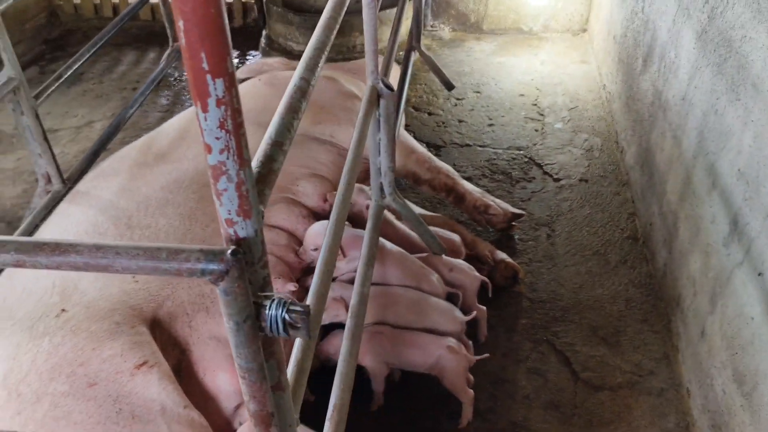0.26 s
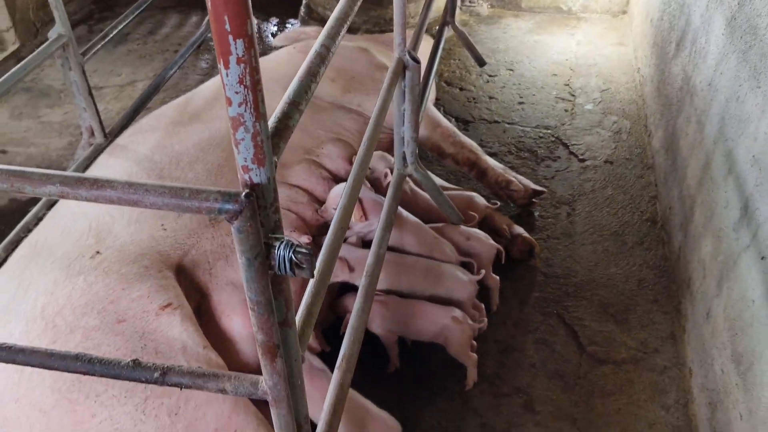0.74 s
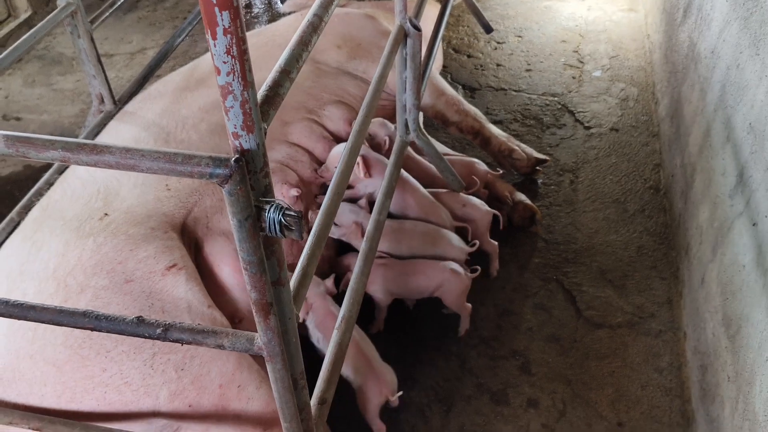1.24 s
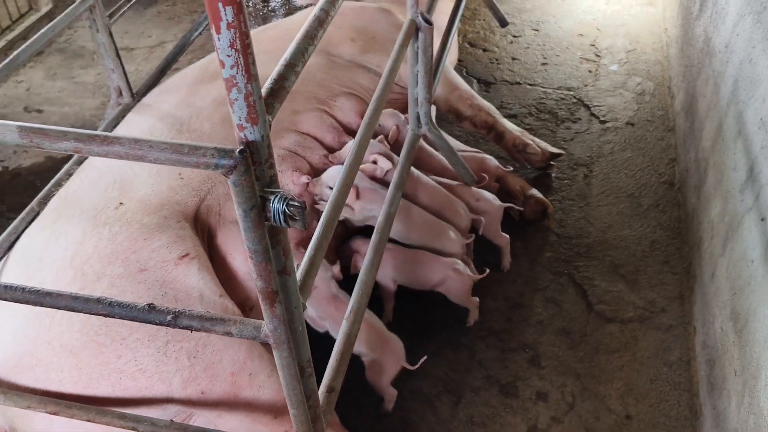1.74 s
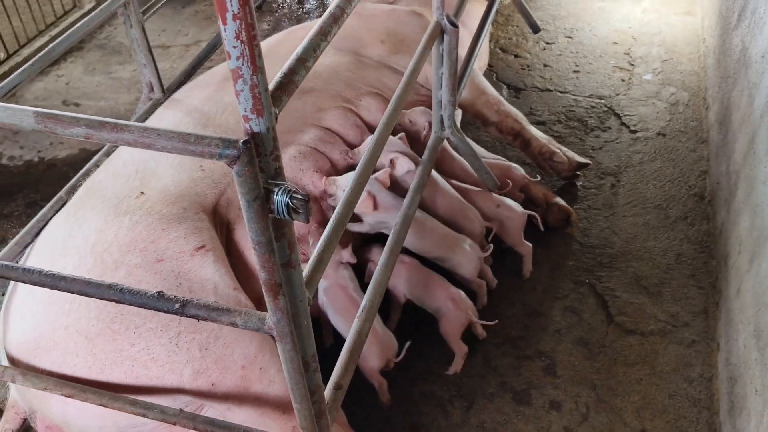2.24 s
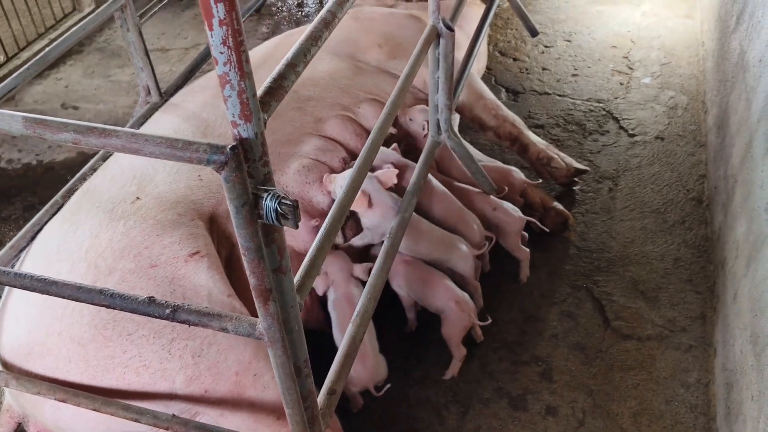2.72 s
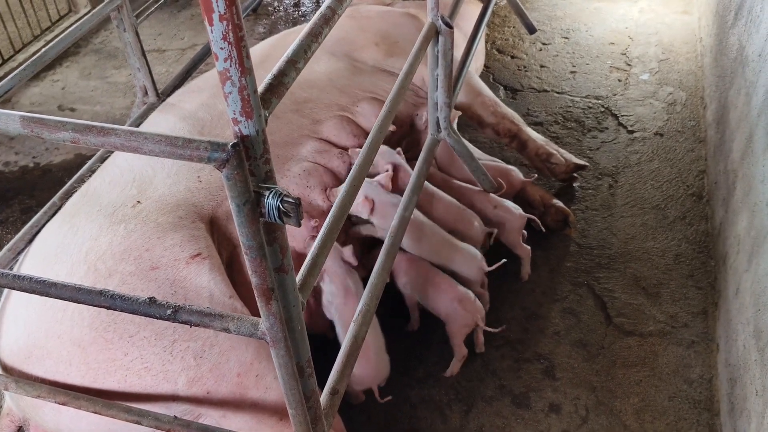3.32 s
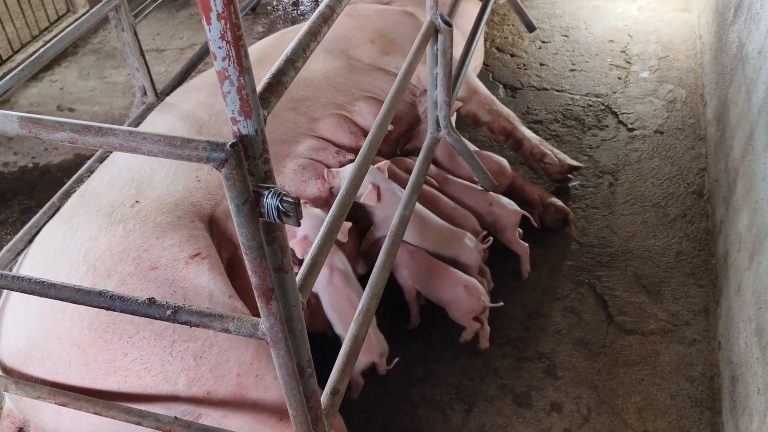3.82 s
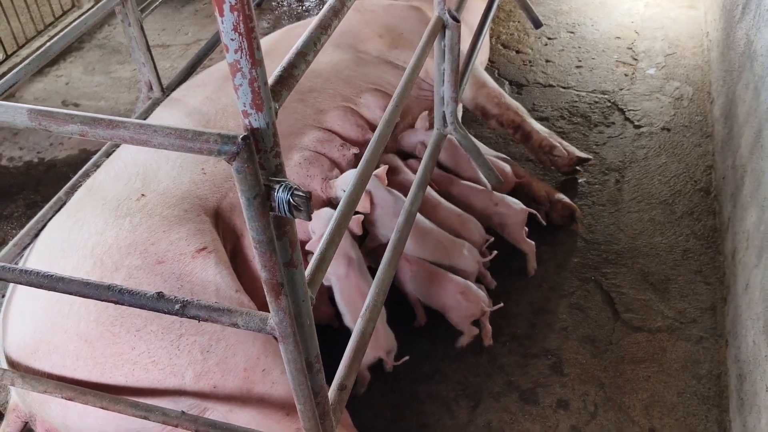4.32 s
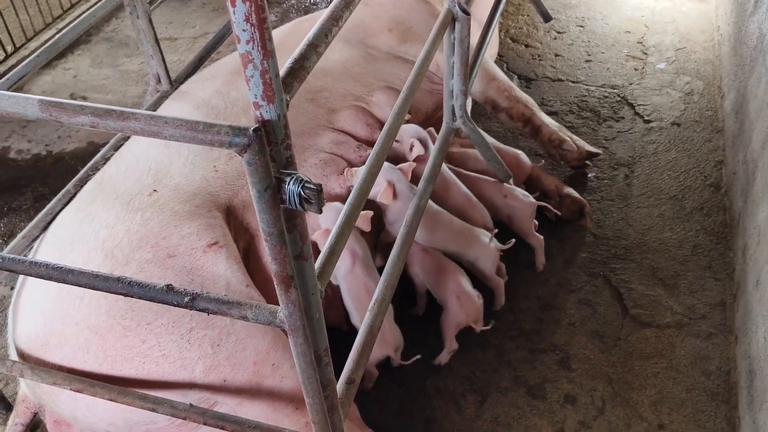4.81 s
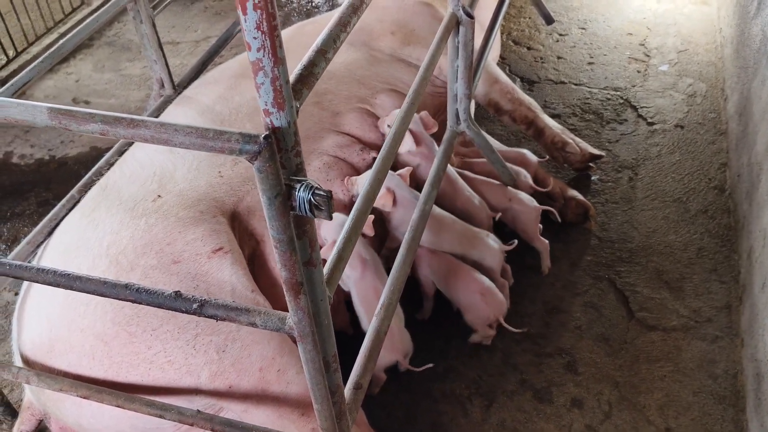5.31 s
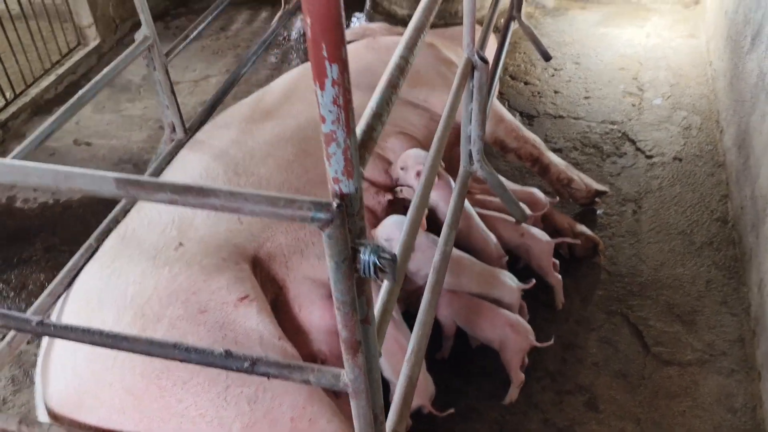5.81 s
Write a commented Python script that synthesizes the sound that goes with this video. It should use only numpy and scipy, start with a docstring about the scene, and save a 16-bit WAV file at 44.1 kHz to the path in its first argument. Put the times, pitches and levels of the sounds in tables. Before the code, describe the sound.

In a concrete pen, a sow gives short, low, rattling grunts about every half second, with three in quick succession near the end. Her piglets make soft, wet smacks at the teats, and one gives a brief squeal at the very end. A distant engine hums underneath with a soft rush of air. The grunts sound close, with a slight boom from the pen.

```python
"""A concrete pen, where a sow grunts to her suckling litter. Each grunt is a slow pulse train from the
vocal folds, filtered first by the resonances of the snout and then by those of the opening mouth;
the pen answers with reverberation and booming low modes. Piglets smack at the teats and one squeals.
Two thin whistles pass, over the hum of a distant engine, a soft rush of air and a high hiss."""
import sys
import numpy as np
from scipy import signal
from scipy.fft import rfft, irfft, next_fast_len
from scipy.io import wavfile
from scipy.ndimage import map_coordinates

SR = 44100
rng = np.random.default_rng(int(sys.argv[2]) if len(sys.argv) > 2 else 0)


def waveform_to_disk(signal):
    """Save audio, clipped to [-1, 1], as 16-bit WAV at the path in sys.argv[1]."""
    frames = np.transpose(np.atleast_2d(signal))
    scaled = np.clip(frames, -1, 1) * 32767
    samples = np.round(scaled).astype(np.int16)
    wavfile.write(sys.argv[1], SR, samples)


N = 266893

# Levels in the tables are relative; each source adds its own gain.
# Likeness of left and right in the diffuse field: frequency_hz, correlation
COHERENCE = [(140, 0.97), (210, 0.85), (330, 0.028), (640, -0.0018), (1200, -0.69), (3000, 0.0039),
             (12000, -0.33)]
# Reverberation time of the pen: frequency_hz, t60_s
PEN_DECAY = [(100, 0.25), (500, 0.23), (1800, 0.26), (5000, 0.23), (12000, 0.1)]
# Standing waves of the pen: frequency_hz, width_hz, gain_db
PEN_MODES = [(56, 7, 0), (72, 10, 6), (120, 9, 7), (172, 14, -9), (276, 16, -2), (574, 14, -11),
             (967, 14, -14), (1785, 16, -12)]
# Spectra of the shed's rush and of the hiss: frequency_hz, gain_db
AIR_SPECTRUM = [(25, -20), (55, -9), (105, -11), (150, -5), (190, -6.5), (250, -12), (330, -19), (440, -16),
                (540, -25.5), (1300, -24), (1900, -26.5), (4070, -40.5), (7000, -43.5), (9500, -55)]
HISS_SPECTRUM = [(5000, -14), (7500, -12), (9000, 1), (10200, -6.5), (11500, -16.5), (15500, -15)]
# Course of the rush: time_s, level_db
AIR_LEVEL = [(0, -47.5), (3.6, -47), (4.8, -43.5), (6.05, -36.5)]
# Course of the engine: time_s, fifth_order_hz, level_db
ENGINE_COURSE = [(0, 173, -44), (.5, 174, -35.5), (1.2, 177, -42), (2.5, 177, -44), (3.3, 177, -37.5),
                 (3.9, 179, -31.5), (4.55, 175, -36.5), (4.95, 171, -32.5), (5.5, 168, -33.5),
                 (5.85, 164, -28), (6.05, 160, -30)]
# Engine orders: multiple_of_fundamental
ORDER_NUMBERS = [4, 5, 6, 7, 10, 12]
# Strength of each order: level_db
ORDER_DB = [-43, 1, -3.5, -17.5, -23, -23.5]
# Airy whistles: start_s, end_s, pitch_hz, level_db
WHISTLES = [(3.306, 3.483, 5060, -49.5), (3.81, 3.97, 5040, -51)]
# Smacks at the teats, and one faint short squeak: time_s, level_db, cheek_db, rise_s
SMACKS = [(.453, -43.5, 3, 0.012), (.786, -32, -41, .004), (1.645, -41.5, 6, 0.012),
          (1.903, -42.5, -2, .001), (1.951, -35.5, 5.5, 0.0014), (2.626, -43, 0, 0.01),
          (3.083, -32.5, -15, 0.016), (4.105, -45, -8, 0.011), (4.839, -57.5, 19, 0.0043),
          (5.021, -40, -2, 0.0026), (5.413, -37, -13, 0.00089), (5.656, -45, -3, .006)]
# Filters of a piglet's lips, cheeks and vocal tract: frequency_hz, gain_db
LIP_SPECTRUM = [(2500, -23), (5500, 3), (7500, 3), (10500, 1), (15000, -4)]
CHEEK_SPECTRUM = [(500, -18), (1400, 0), (2500, 14), (4200, -13), (7000, -8.5)]
PIGLET_TRACT = [(500, -29), (850, 6), (1020, 8.5), (1500, -10.5), (2070, 10), (2550, -3.5), (3080, -3.5),
                (3700, -17), (4800, -13), (6100, -19), (7500, -46), (14000, -33)]
# Contour of the squeal: time_s, pitch_hz, level_db
SQUEAL_CONTOUR = [(5.795, 979, -48), (5.83, 991, -31.5), (5.88, 1032, -27.5), (5.915, 978, -32),
                  (5.945, 1048, -32), (5.972, 1022, -27)]
# Formants of the sow, mouth shut and mouth open: frequency_hz, width_hz, gain_db
SNOUT_FORMANTS = [(122, 89, -11.5), (260.5, 92, 0.5), (418, 101, -2.5), (554, 68, -1.5), (854, 80, -8),
                  (2295, 112.6, -24), (2650, 64, -27), (3195, 220, -25), (3780, 400, -26),
                  (5040, 440, -28.5), (5970, 100, -35.5), (7040, 1000, -43)]
MOUTH_FORMANTS = [(120, 140, -7), (246.5, 57, -11), (402, 117, -2), (586.5, 132, 4.5), (990, 99.5, 0),
                  (2107, 134, -14), (2693, 465, -14), (3220, 190, -17.5), (3840, 250, -26.5),
                  (5000, 1100, -31.5), (6660, 1100, -43)]
# A formant that climbs as the jaw drops: opening_fraction, frequency_hz, width_hz, gain_db
JAW_FORMANT = [(0, 1060, 110, -16), (.48, 1270, 170, -13.5), (.6, 1680, 240, -11), (.8, 1760, 190, -7)]
# A narrow mouth gap lets the middle tones through first: frequency_hz, exponent_of_opening
GAP_EXPONENT = [(300, 1.53), (700, 0.99), (1100, 1.13), (2000, 1.68)]
# Phase by which the left channel of a clap leads the right: frequency_hz, lead_rad
LEFT_LEAD = [(130, 0.5), (290, -1.5), (600, -1.42), (950, -5), (1640, -1), (3000, -4.5)]
# Single beats of the folds before a grunt: time_s, level_db
CATCHES = [(1.052, -35.5), (1.561, -32), (2.089, -31), (2.712, -23), (3.495, -30), (4.17, -28)]
# The sow's grunts: start_s, end_s, beat_count, slowing_fraction, effort_db, swell_db, fade_db,
# half_open_after_s, widest_fraction, sharpness_db, snap_db
GRUNTS = [(0.32, 0.451, 4, 0.14, 0, 17.5, 4.5, -0.15, 0.83, -3, 1.5),
          (0.546, 0.733, 5, 0.07, 1, 12, 14.5, -0.033, 0.85, -4.5, -14),
          (1.144, 1.303, 5, 0, 4, 12.5, 6.5, -0.06, 0.87, 0, 7.5),
          (1.646, 1.787, 5, 0.09, 10, 17.5, 8, 0.11, 0.87, -3.5, 3),
          (2.148, 2.322, 6, 0.03, 8.5, 18.5, 6, 0.12, 0.82, -1, 8),
          (2.792, 2.939, 5, 0.06, 9, 9, 8.5, 0.0833, 0.9, 0.5, -9),
          (3.546, 3.733, 6, .05, 6, 15, 7, 0.097, 0.96, 1.5, 7),
          (4.246, 4.397, 5, .07, 4.5, 12.5, 5, 0.0586, 0.87, 0, -4.5),
          (5.03, 5.195, 5, 0.07, 2.5, 12.5, 2.5, 0.018, 0.87, -6, -3),
          (5.282, 5.496, 6, 0, -0.5, 5.5, 4, -0.021, 0.84, -5.5, 4.5),
          (5.54, 5.665, 4, 0.04, 0.5, 4.5, 1, -0.058, 0.88, -1.5, 7.5)]
# Spectra of the squeal's breath and of the sow's puff and clap: frequency_hz, gain_db
BREATH_SPECTRUM = [(1000, 12), (3000, 7.3), (5000, 20.4)]
PUFF_SPECTRUM = [(150, -10), (600, -4), (1500, 7.5), (3000, 3.5)]
CLAP_SPECTRUM = [(1000, 0), (1800, -4), (3000, -18)]
# Sharp closure adds bite, slack closure loses treble: frequency_hz, db_per_db_of_sharpness
BITE = [(1300, 0.15), (2600, 1), (5000, 0.59)]
DULLING = [(3200, 0.38), (4200, 2.7)]
# The sow's stereo balance, opposite on the right: frequency_hz, left_gain_db
SOW_BALANCE = [(300, -1.2), (700, -1.05), (1300, -0.82), (4000, -1.4)]


def amp(db):
    """Decibels as an amplitude ratio."""
    return 10 ** (np.asarray(db) / 20)


def unit(x):
    """Normalisation to unit RMS."""
    return x / np.sqrt(np.mean(x ** 2) + 1e-20)


def along(points, hz):
    """Interpolation of (frequency_hz, value) points on a log axis."""
    frequencies, values = np.transpose(points)
    return np.interp(np.log(hz + 1), np.log(frequencies + 1), values)


def curves(rows, at=None):
    """Linear interpolation of each column against the first, by default at every sample time."""
    knots, *columns = np.transpose(rows)
    return [np.interp(np.arange(N) / SR if at is None else at, knots, c) for c in columns]


def wobble(rate_hz):
    """Slow random modulation: a spline through Gaussian knots."""
    knots = rng.standard_normal(int(N * rate_hz / SR) + 4)
    return map_coordinates(knots, [np.arange(N) * rate_hz / SR])


def filtered(x, response):
    """Linear filtering: the spectrum is multiplied by a complex response."""
    n = x.shape[-1]
    size = next_fast_len(n + SR // 2 if n > SR else 2 * n)
    return irfft(rfft(x, size) * response(np.fft.rfftfreq(size, 1 / SR)), size)[..., :n]


def coloured(x, spectrum):
    """Zero-phase filtering by (frequency_hz, gain_db) points."""
    return filtered(x, lambda hz: amp(along(spectrum, hz)))


def minimum_phase(gain):
    """Causality: folding the cepstrum gives a response that rings only after its excitation."""
    cepstrum = irfft(np.log(gain + 1e-6))
    half = len(cepstrum) // 2
    return np.exp(rfft(np.r_[cepstrum[0], 2 * cepstrum[1:half], cepstrum[half], np.zeros(half - 1)]))


def add(track, start_s, sound):
    """Superposition of a sound on a track."""
    part = track[:, max(round(start_s * SR), 0):][:, :sound.shape[-1]]
    part += sound[..., :part.shape[-1]]


def diffuse(pair):
    """Diffuse-field coherence: two independent signals become left and right, alike in the bass."""
    def mid_side_gains(hz):
        angle = np.arccos(along(COHERENCE, hz)) / 2
        return np.array([np.cos(angle), np.sin(angle)])
    mid, side = filtered(pair, mid_side_gains)
    return np.array([mid + side, mid - side])


def in_pen(x, wet_db, build_s=0.0073):
    """Reverberation: reflections from the concrete follow the direct sound and decay exponentially."""
    hz, t, noise = signal.stft(rng.standard_normal((2, SR // 3)), SR, nperseg=256)
    envelope = amp(-60 * t / along(PEN_DECAY, hz)[:, None]) * (1 - np.exp(-t / build_s))
    tail = signal.istft(noise * envelope, SR, nperseg=256)[1]
    response = amp(wet_db) * coloured(diffuse(tail / np.linalg.norm(tail[0])), [(120, 5.5), (500, 0)])
    response[:, 0] += 1  # direct sound
    return signal.fftconvolve(np.atleast_2d(x), response, axes=1)


def pen_modes(hz):
    """Modal response: each standing wave of the pen is a damped resonator."""
    return sum(amp(db) * 1j * hz * width / (centre ** 2 - hz ** 2 + 1j * hz * width)
               for centre, width, db in PEN_MODES)


def background(air_db=8, hiss_db=-56):
    """Filtered noise: the diffuse, slowly rising rush of the shed and a steady high hiss."""
    air = unit(coloured(diffuse(rng.standard_normal((2, N))), AIR_SPECTRUM))
    air *= amp(curves(AIR_LEVEL)[0] + air_db + 0.27 * wobble(8))
    hiss = unit(coloured(rng.standard_normal((2, N)), HISS_SPECTRUM))
    return air + hiss * amp(hiss_db) * amp([[-1.5], [1.5]])


def engine(gain_db=2, flutter_db=3.5):
    """Harmonic series: only the low orders of a far engine carry, each fluttering on its own."""
    fifth_order_hz, level_db = curves(ENGINE_COURSE)
    phase = 2 * np.pi * np.cumsum(fifth_order_hz / 5) / SR
    hum = sum(amp(db + flutter_db * wobble(8)) * np.sin(order * phase + .5 * wobble(12))
              for order, db in zip(ORDER_NUMBERS, ORDER_DB))
    return amp(level_db + gain_db) * unit(hum)


def whistles(half_width_hz=220):
    """Narrow-band noise is heard as pitch: two thin, airy whistles swell and fade."""
    out = np.zeros((2, N))
    for start_s, end_s, pitch_hz, level_db in WHISTLES:
        n = int((end_s - start_s) * SR)
        noise = rng.standard_normal((2, n))
        band = filtered(noise, lambda hz: 1 / (1 + ((hz - pitch_hz) / half_width_hz) ** 2))
        add(out, start_s, amp(level_db) * unit(band) * signal.windows.tukey(n, .7))
    return out


def suckling(lip_gain_db=-3, cheek_gain_db=-5, t60_s=0.079, tick_count=40):
    """Noise transients: lips lose the teat in crackles that build and snap off; one burst is a squeak."""
    out = np.zeros((2, N))
    t = np.arange(-SR // 10, SR // 10) / SR
    # fainter ticks at random times, in the columns of SMACKS
    ticks = [(when * N / SR, -59 + 9 * size, -1, 0.017) for when, size in rng.random((tick_count, 2))]
    for time_s, level_db, cheek_db, rise_s in list(SMACKS) + ticks:
        crackle = rng.standard_normal((2, len(t))) * amp(5 * rng.standard_normal(len(t)))
        lips = amp(lip_gain_db) * unit(coloured(crackle, LIP_SPECTRUM))
        cheeks = amp(cheek_gain_db + cheek_db) * unit(coloured(crackle, CHEEK_SPECTRUM))
        envelope = np.exp(np.minimum(t, 0) / rise_s) * amp(-60 * np.maximum(t, 0) / t60_s)
        add(out, time_s + t[0], amp(level_db) * in_pen((lips + cheeks) * envelope, wet_db=-6.5))
    return out * amp([[-2.5], [2.5]])


def squeal(gain_db=3, subharmonic=0.58, rasp=0.19, jitter=0.015):
    """Period doubling: a piglet's folds alternate strong and weak cycles, adding half-order lines."""
    pitch_hz, level_db = curves(SQUEAL_CONTOUR)
    t = np.arange(N) / SR
    span = (t > SQUEAL_CONTOUR[0][0]) & (t < SQUEAL_CONTOUR[-1][0])
    phase = 2 * np.pi * np.cumsum(pitch_hz * (1 + jitter * wobble(300))) / SR
    half_orders = np.arange(1, 20)[:, None]
    strengths = np.where(half_orders % 2, subharmonic, 1)
    folds = unit((strengths * np.cos(half_orders * phase[span] / 2)).sum(0))
    breath = coloured(rng.standard_normal(span.sum()), BREATH_SPECTRUM)
    envelope = amp(level_db[span] + gain_db) * signal.windows.tukey(span.sum(), .1)
    cry = unit(coloured(folds + rasp * breath, PIGLET_TRACT)) * envelope
    out = np.zeros((2, N))
    add(out, t[span][0], in_pen(cry, wet_db=-3))
    return out * amp([[-1], [1]])


def airway(formants, hz, vary_db=1.8):
    """Formant resonance: peaks between deep valleys, varied from beat to beat by soft tissue."""
    return sum(amp(db + vary_db * rng.standard_normal()) / (1 + 2 * ((hz - centre) / width) ** 2) ** 1.5
               for centre, width, db in formants)


def scatter(hz, width_hz=220):
    """All-pass dispersion: floor and crate delay some bands, spreading a clap into a short burst."""
    centres_hz = np.array([160, 280, 280, 430, 570, 570, 800, 980, 980, 1700])
    centres_hz = centres_hz * (1 + .1 * rng.standard_normal(10))
    poles = np.prod([centre ** 2 - hz ** 2 + 1j * hz * width_hz for centre in centres_hz], axis=0)
    return np.conj(poles) / poles


def fold_beat(opening, sharpness_db, snout_scale, puff_s=0.0049, wall_delay_s=0.02, size=4096):
    """Source and filter: a clap of the folds and a puff of air pass through snout and mouth."""
    t, hz = np.arange(size) / SR, np.fft.rfftfreq(size, 1 / SR)
    burst = rng.standard_normal((2, size)) * t * np.exp(-t / puff_s)
    puff = rfft(diffuse(burst / np.linalg.norm(burst[0]))) * amp(along(PUFF_SPECTRUM, hz))
    clap = scatter(hz) * amp(along(CLAP_SPECTRUM, hz))
    clap = clap * np.exp(.5j * along(LEFT_LEAD, hz) * [[1], [-1]])
    source = clap + (0.66 + 0.25 * opening) * puff  # rougher with the mouth open
    snout = (1 - opening) * airway(SNOUT_FORMANTS, hz / snout_scale)
    mouth = opening ** along(GAP_EXPONENT, hz) * airway(MOUTH_FORMANTS, hz)
    jaw = airway([curves(JAW_FORMANT, opening)], hz)
    closure = amp(sharpness_db * along(BITE if sharpness_db > 0 else DULLING, hz))
    wall_echo = 1 + 0.17 * np.exp(-2j * np.pi * hz * wall_delay_s)
    return irfft(source * minimum_phase((snout + mouth + jaw) * closure) * wall_echo)


def beat_times(length_s, count, slowing):
    """Geometric progression: each period exceeds the last by the fraction slowing."""
    ends = np.cumsum((1 + slowing) ** np.arange(round(count) - 1))
    return length_s * np.r_[0, ends / ends[-1]]


def grunt(length_s, count, slowing, effort_db, swell_db, fade_db, half_open_s, widest, sharpness_db,
          snap_db, attack_s=0.1, release_s=0.068, jaw_s=0.031):
    """Pulse phonation: slow beats swell, pass from snout to mouth and fade as the air runs out."""
    out = np.zeros((2, SR))
    for s in beat_times(length_s, count, slowing):
        weak_db = swell_db * np.maximum(1 - s / attack_s, 0) ** 2
        spent_db = fade_db * np.maximum(1 - (length_s - s) / release_s, 0)
        opening = widest / (1 + np.exp((half_open_s - s) / jaw_s))
        pop_db = 11.5 * np.exp(-((s - half_open_s - 0.036) / 0.01) ** 2)  # just after the mouth opens
        edge_db = sharpness_db + snap_db * (s == 0) + weak_db + pop_db  # weak early beats are thin
        snout_scale = 1 + 0.063 * np.exp(-s / 0.029)  # formants sink as the throat relaxes
        add(out, s, amp(effort_db - weak_db - spent_db) * fold_beat(opening, edge_db, snout_scale))
    return out


def sow(gain_db=21, catch_gain_db=17, boom_db=7.5, lead_s=0.0022):
    """Forced resonance: the grunts and the single beats before them set the pen's modes booming."""
    voice = np.zeros((2, N))
    for start_s, end_s, *gesture in GRUNTS:
        add(voice, start_s - lead_s, amp(gain_db) * in_pen(grunt(end_s - start_s, *gesture), wet_db=-6.5))
    for time_s, level_db in CATCHES:
        catch = in_pen(fold_beat(opening=1, sharpness_db=-10, snout_scale=1), wet_db=-3)
        add(voice, time_s - lead_s, amp(gain_db + catch_gain_db + level_db) * catch)
    boom = amp(boom_db) * filtered(voice.mean(0), pen_modes)
    return filtered(voice, lambda hz: amp(along(SOW_BALANCE, hz) * [[1], [-1]])) + boom


def scene():
    """Superposition: the pressures of all sources add."""
    return sow() + squeal() + suckling() + whistles() + engine() + background()


def record(dry):
    """Band limiting: the microphone rolls off the deepest bass and cuts the highest treble."""
    low_hz, top_hz = 38.0, 15900
    return filtered(dry, lambda hz: (hz < top_hz) * hz ** 4 / np.sqrt(hz ** 8 + low_hz ** 8))


dry = scene()
out = record(dry)
waveform_to_disk(out)
```